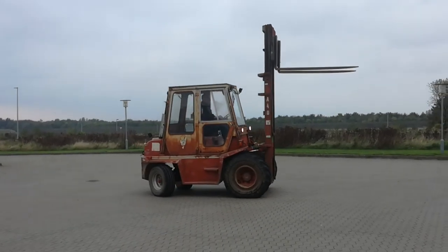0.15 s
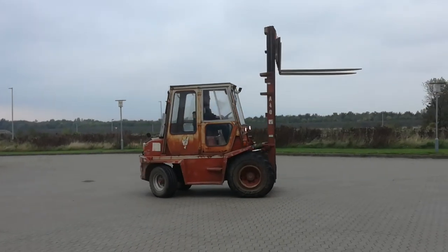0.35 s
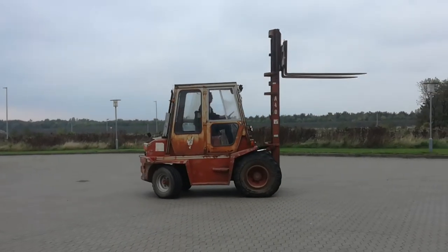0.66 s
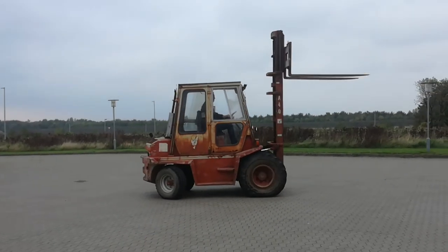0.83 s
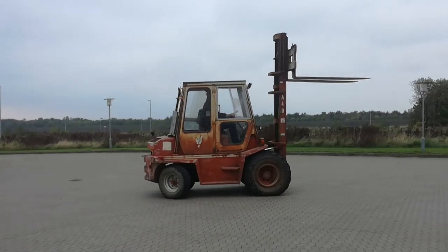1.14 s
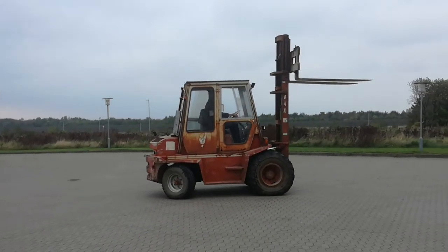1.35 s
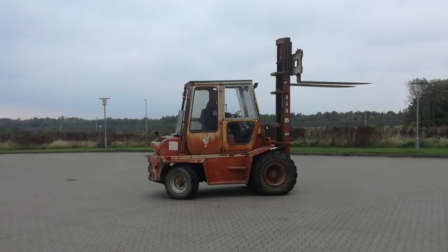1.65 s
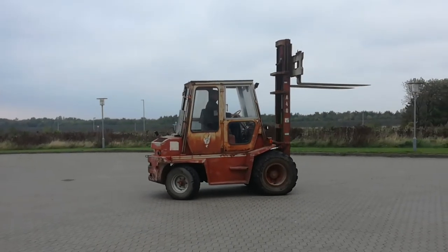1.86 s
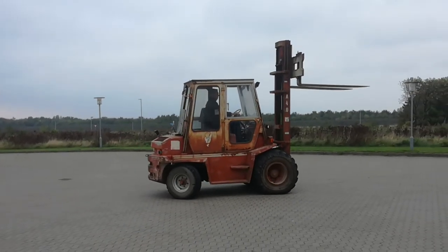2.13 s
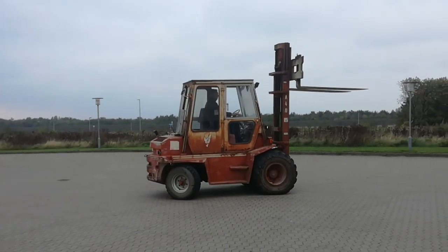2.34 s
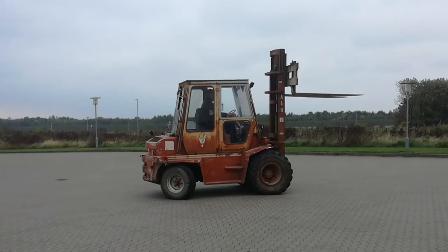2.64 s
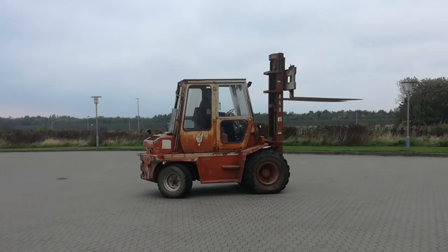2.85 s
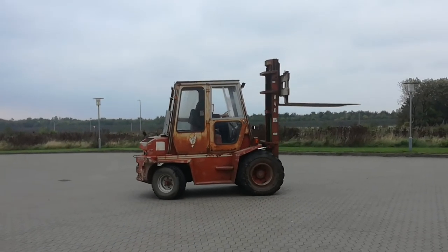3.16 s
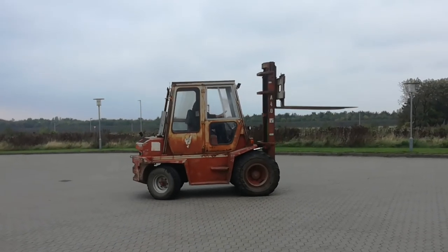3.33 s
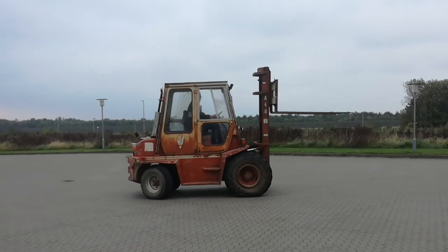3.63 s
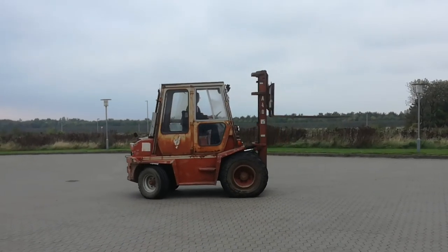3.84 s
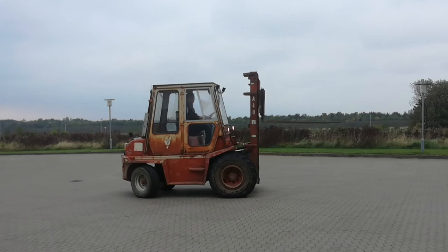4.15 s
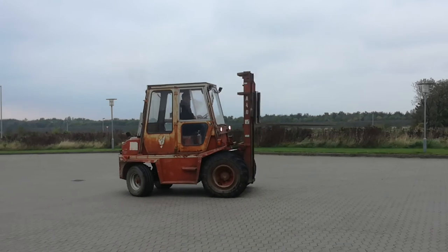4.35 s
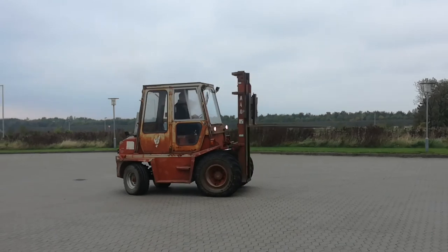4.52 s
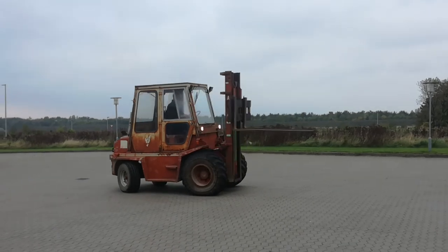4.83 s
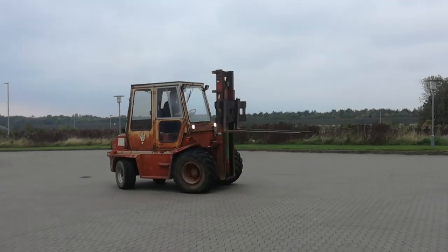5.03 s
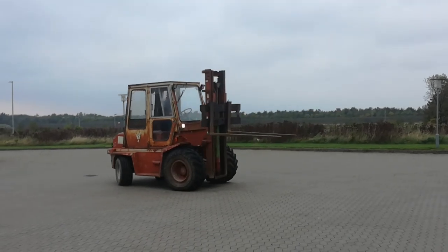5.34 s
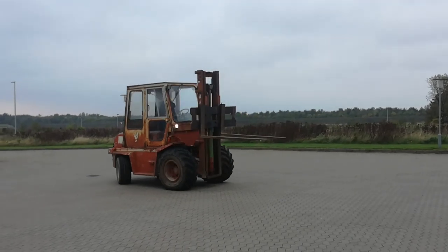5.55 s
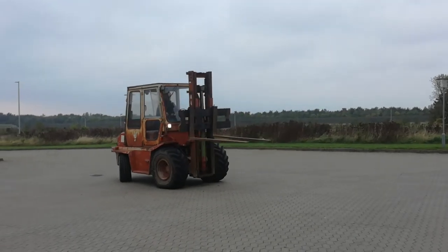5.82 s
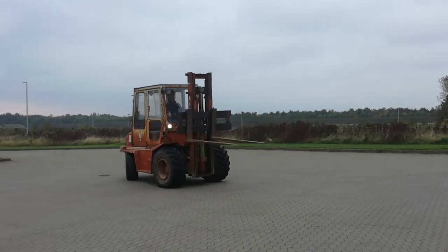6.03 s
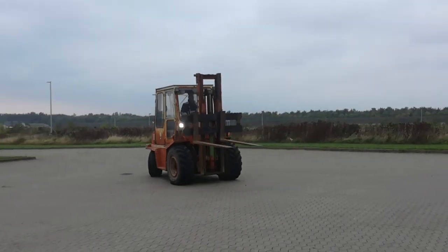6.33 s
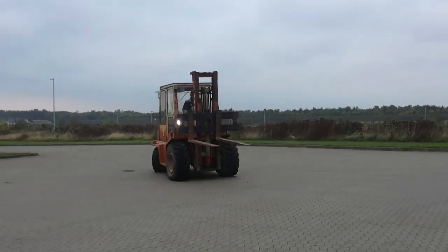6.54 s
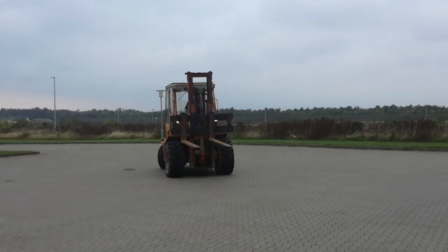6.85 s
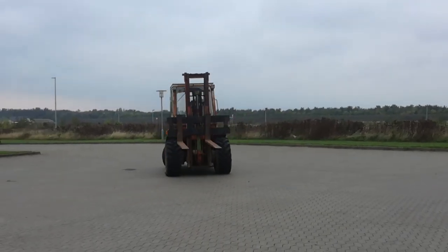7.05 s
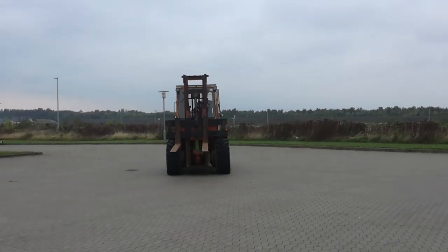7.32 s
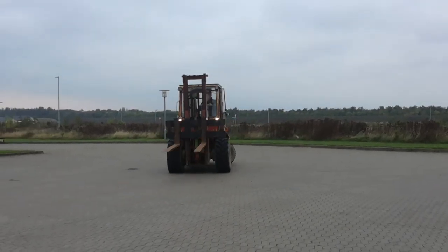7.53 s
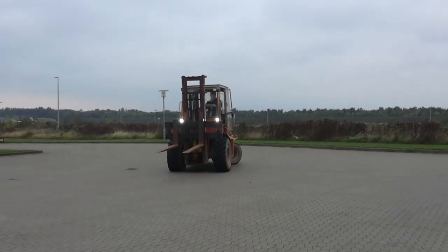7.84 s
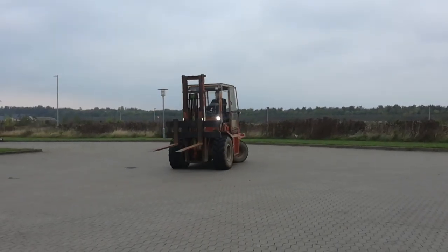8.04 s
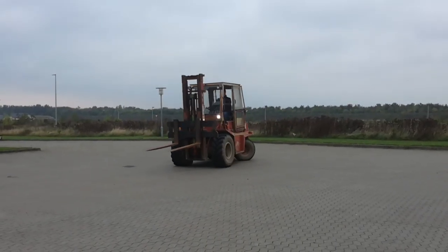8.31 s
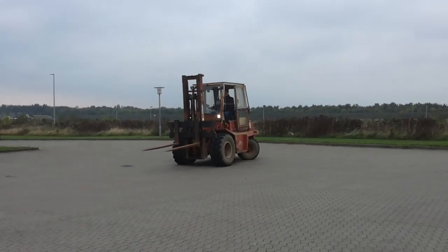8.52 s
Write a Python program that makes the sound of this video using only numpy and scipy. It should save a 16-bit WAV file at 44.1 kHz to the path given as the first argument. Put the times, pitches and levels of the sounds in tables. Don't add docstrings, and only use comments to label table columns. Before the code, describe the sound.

An old diesel forklift throbs and clatters outdoors while its mast scrapes down in jerks, then one long squealing slide ending in hard clunks.

```python
import sys
import numpy as np
from scipy import signal
from scipy.fft import rfft, irfft, next_fast_len
from scipy.io import wavfile
from scipy.ndimage import uniform_filter1d

SR = 44100
rng = np.random.default_rng(int(sys.argv[2]) if len(sys.argv) > 2 else 0)


def elevation(decibels):
    levels = np.asarray(decibels, float)
    return 10 ** (levels / 20)


def generate_wav(signal):
    frames = np.transpose(np.atleast_2d(signal))
    scaled = np.clip(frames, -1, 1) * 32767
    pcm = np.round(scaled).astype(np.int16)
    wavfile.write(sys.argv[1], SR, pcm)


N = 382769
T = np.arange(N) / SR
SIZE = next_fast_len(N + SR // 4)
HZ = np.fft.rfftfreq(SIZE, 1 / SR)

# time in seconds, block clatter in dB, heading in quarter turns from side on.
TURNING = [
    (1.35, -39.5, 0.05),
    (2.05, -38.5, 0.01),
    (4.3, -36.5, 0.35),
    (5.2, -39.5, 0.71),
    (6.4, -40.5, 0.88),
    (6.8, -40, 0.98),
    (7.5, -40, 1.11),
    (8.05, -41, 1.57),
    (8.6, -41.5, 1.4),
]
# time in seconds, pull in dB, boom of pipe and paving in dB.
LOAD = [(0.1, 3, 4), (0.4, -6, 1.5), (1.0, 4.5, -6), (2.05, -5, -1), (2.2, 0, 4.5), (2.65, 3.5, -1),
        (3.85, 1, -0.5), (4.15, 14.5, 0.5), (4.45, 2.5, -7), (4.6, 2.5, 1), (5.2, 4.5, -3),
        (5.35, -20, 5.5), (5.65, -1, 7), (5.8, -2.5, 1.9), (7.75, -0.2, 3), (8.05, 5.5, 2)]
# frequency in Hz, level in dB per Hz.
SLACK_CHAIN = [(120, -48), (200, -17), (386, -8.5), (455, -2), (527, -12.5), (610, 1), (1360, -1.5),
               (1610, -8), (2000, 1), (2310, -11.5), (4470, -5.5), (5560, -13.5), (8160, -26), (9100, -28),
               (15800, -33.5)]
# frequency in Hz, width in Hz, level in dB (all stand out alike here).
RAILS = [(536, 58, -5), (1340, 330, -1), (1816, 115, 0), (2960, 210, -12), (3424, 77, -11), (4150, 540, -8),
         (4870, 84, -11), (6240, 43, -17), (6710, 120, -20), (7870, 210, -21)]
# likeness of the ports,
# lead of the left in radians, left over right in dB.
MAST_PORTS = ([(60, -8), (130, 13), (290, 1), (640, 0.22), (1410, 0.78), (3100, 0.56), (6820, 0.5),
               (15000, 0)], [(0, 5.5), (1980, -0.4), (3530, 2), (4220, 2.5), (4650, 8), (5340, 8),
               (6030, 9), (7840, 5), (9990, 0), (11800, 31.5), (12300, 10), (14100, 8), (14900, 5),
               (15500, 18)], [(60, -2), (110, 7), (200, 0.5), (380, -0.5), (700, -1.5), (1290, -2),
               (2380, 2.5), (4400, -3.5), (8120, -8), (15000, 4.5)])
# Hz with likeness, radians, dB.
ENGINE_PORTS = ([(60, 0.88), (130, 1), (290, 0.63), (640, 0.55), (1410, 1), (3100, -0.6), (6820, 1),
                 (15000, 1)], [(0, 1), (690, -1.0), (1460, -8), (1720, -13), (2150, -9), (3100, -18),
                 (4050, -17.5), (4390, -18.5), (6200, -20.5), (9390, -22), (10500, -31.5), (12000, -43.5),
                 (13600, -40), (15500, -69)], [(60, -5), (110, -6), (200, 1), (380, -1.5), (700, 2.5),
                 (1290, -1), (2380, 9.5), (4400, -6), (8120, -9.5), (15000, 13)])


def evened(x):
    return x / np.sqrt(np.mean(x ** 2) + 1e-20)


def read(points):
    f, value = np.transpose(points)
    return np.interp(np.log(HZ + 1), np.log(f + 1), value)


def follow(rows):
    s, *columns = np.transpose(rows)
    return [np.interp(T, s, c) for c in columns]


def drift(hz):
    return evened(irfft(rfft(rng.standard_normal(SIZE)) / (1 + (HZ / hz) ** 4), SIZE)[:N])


def bump(x, centre, half):
    return np.exp(-((x - centre) / half) ** 2)


def dying(s, db, t60):
    return elevation(db - 60 * np.clip(T - s, 0, 1) / t60) * (T > s)


def shelf(hz):
    return 1 / (1 + (HZ / hz) ** 8)


def body(spectrum, peaks, lift_db):
    rings = sum(elevation(lift_db) / (1 + 2j * (HZ - hz) / width) for hz, width, _ in peaks)
    return elevation(read(spectrum)) * (1 + rings)


def unit(colour, lo_hz, hi_hz):
    inside = colour[(HZ > lo_hz) & (HZ < hi_hz)]
    return colour / np.sqrt(np.sum(abs(inside) ** 2) / len(HZ))


def ported(a, b, colour, ports):
    same, lead, balance_db = np.clip(read(ports[0]), 0, 1), read(ports[1]), read(ports[2])
    same = np.minimum(same, 0.35 + 0.65 * shelf(hz=5500))
    a, b = rfft([a, b], SIZE)
    left = a * np.exp(1j * lead) * elevation(balance_db / 2)
    right = (same * a + np.sqrt(1 - same ** 2) * b) * elevation(-balance_db / 2)
    return irfft(np.array([left, right]) * colour, SIZE)[:, :N]


def heard(gate, colour, ports):
    return ported(*gate * rng.standard_normal((2, N)), colour, ports)


def rumble(load_db):
    # frequency in Hz, level in dB per Hz.
    roll = [(12, -45), (20, -32), (71, -8.5), (96, -8.5), (122, -18.5), (147, -13.5), (400, -12),
            (520, -64), (880, -120)]
    slow_load_db = uniform_filter1d(load_db + 48.5, size=SR // 2)
    level = elevation(-51 + 0.44 * slow_load_db + 1.7 * drift(hz=1.0))
    return heard(level, unit(elevation(read(roll)) * shelf(hz=374), 20, 400), ENGINE_PORTS)


def pump_whines():
    # time in seconds, pitch in Hz, level in dB.
    whines = [
        [(.86, 1955, -46), (1.0, 1935, -49), (1.06, 1935, -58), (1.11, 1930, -45), (1.44, 1912, -42),
         (1.52, 1925, -45), (1.74, 1915, -45), (1.82, 1925, -57), (1.9, 1935, -50), (2.08, 1885, -50)],
        [(.29, 1500, -46), (.38, 1500, -44), (.5, 1500, -56), (.57, 1503, -43), (.72, 1505, -48),
         (.87, 1500, -52)],
        [(0, 1850, -44), (.1, 1845, -44), (.15, 1805, -45), (.27, 1800, -46)],
    ]
    out = np.zeros(N)
    for rows in whines:
        hz, db = follow(rows)
        on = np.clip(np.minimum(T - rows[0][0], rows[-1][0] - T) / 0.015, 0, 1)
        turn = 2 * np.pi * np.cumsum(hz + 2.0 * drift(hz=17.5)) / SR
        out += on * elevation(db + 5.0 + 1.0 * drift(hz=32.0)) * np.cos(turn)
    return out


def ticks():
    # start in seconds, peak in dB.
    faint_ticks = [(1.4462, -53), (1.5774, -62), (3.9292, -52), (4.0983, -52), (4.4081, -58), (4.5431, -50),
                   (4.6031, -53), (4.8073, -51), (5.7418, -51), (5.8027, -49.5), (6.0531, -51),
                   (6.6191, -50), (6.879, -55), (7.1596, -54)]
    # start in seconds, peak in dB, t60 in seconds.
    snaps = [(7.814, -28, 0.019), (7.819, -24, 0.02), (7.825, -26.5, 0.031), (7.831, -30, 0.029),
             (7.838, -34, .04)]
    faint = sum(dying(s, db - 9.0, 0.055) for s, db in faint_ticks)
    snap = sum(dying(s, db - 8.5, t60) for s, db, t60 in snaps)
    link = (shelf(hz=7800) - shelf(hz=3500)) * (0.11 + shelf(hz=5770)) + 0.023
    return (heard(faint, unit(1 - shelf(hz=7980), 9000, 15500), ENGINE_PORTS)
            + heard(snap, unit(link, 3500, 9000), MAST_PORTS))


def carriage_raps():
    # start in seconds, peak in dB, t60 in seconds.
    knocks = [(0.146, -30, .04), (2.1, -18, 0.044), (2.49, -28, .02), (3.779, -16, .05), (3.812, -11, 0.05),
              (3.843, -19, 0.076), (3.903, -22, 0.038), (8.581, -38, 0.032)]
    gate = sum(dying(s, db - 11, t60) for s, db, t60 in knocks)
    colour = body(SLACK_CHAIN, RAILS, lift_db=8.0) * (0.41 + shelf(hz=2700))
    return heard(gate, unit(colour, 400, 3000), MAST_PORTS)


def clunks():
    # start in seconds, peak in dB, pitch in Hz, t60 in seconds.
    blows = [(0.974, -22, 221, 0.086), (0.988, -23, 125, 0.089), (2.261, -23, 207, 0.11),
             (2.285, -20.5, 158, 0.084), (2.315, -33, 177, 0.29), (2.389, -27, 120, 0.13),
             (2.418, -23, 109, 0.16), (2.45, -28, 110, 0.13), (3.816, -17, 503, 0.087),
             (3.824, -18.5, 462, 0.053), (3.851, -30, 278, 0.2), (3.878, -23, 111, 0.096),
             (5.561, -37, 109, 0.13)]
    out, t = np.zeros(N + SR), np.arange(SR // 4) / SR
    for s, db, hz, t60 in blows:
        ring = np.zeros(len(t))
        for k, ratio in enumerate([1.024, 1.49, 0.98, 0.35, 3.1, 1.6]):
            fall_db = -3.5 * k - 60 * t * (1 + 2.2 * k) / t60
            ring += elevation(fall_db) * np.sin(2 * np.pi * hz * ratio * t)
        rise = np.minimum(t / 0.003, 1)
        out[round(s * SR):][:len(t)] += elevation(db - 0.5) * ring * rise
    boom = sum(dying(s, db - 11.5, 0.13) for s, db, *_ in blows)
    frame = shelf(hz=447) - shelf(hz=96) + 0.34 * shelf(hz=900) + 0.17 * shelf(hz=2500)
    return out[:N] + heard(boom, unit(frame, 90, 700), MAST_PORTS)


def scrape(chain, rails, spectrum):
    grit = evened(elevation(2.15 * drift(hz=294.0)))
    steel, low = body(spectrum, RAILS, lift_db=5.0), shelf(hz=2720)
    return (heard(chain * grit, unit(steel * (1 - low), 2000, 9000), MAST_PORTS)
            + heard(rails * grit, unit(steel * low, 300, 1825), MAST_PORTS))


def rattle(gate, spectrum, per_s):
    count = 36
    out, (f, level_db) = np.zeros((2, N)), np.transpose(spectrum)
    pitches = np.geomspace(900, 8200, count) * rng.uniform(0.94, 1.04, count)
    widths = rng.uniform(29.0, 84.0, count)
    for hz, width, side in zip(pitches, widths, rng.random(count)):
        hits = gate * (rng.random(N) < per_s / SR) * rng.standard_normal(N) * np.sqrt(SR / per_s)
        r = np.exp(-np.pi * width * np.sqrt(hz / 1000) / SR)
        pole = [1, -r * np.exp(2j * np.pi * hz / SR)]
        soft = signal.lfilter([1 - r], pole, hits)
        ring = signal.lfilter([np.sqrt(1 - r)], pole, soft).real
        out[int(side > 0.5)] += elevation(np.interp(np.log(hz), np.log(f), level_db)) * (hz / 1000) ** 0.16 * ring
    return ported(out[0] + out[1], out[0] - out[1], 1.0, MAST_PORTS)


def jerks():
    # start in seconds, peak in dB, length in seconds, weight of the low rails in dB.
    slips = [(0.0024, -24.5, 0.029, 0), (0.0435, -25, 0.044, -0.5), (0.079, -39, 0.033, 12),
             (0.141, -37.5, 0.025, 11), (0.189, -36, 0.04, 6.5), (0.243, -25.5, 0.042, -1),
             (0.277, -26, 0.043, -1), (0.313, -28, 0.048, 3), (0.367, -24, 0.017, -9),
             (0.4603, -26.5, 0.031, 1.5), (0.532, -23, 0.05, -1.5), (0.592, -30, 0.08, 2),
             (0.641, -23.5, 0.036, -3.5), (0.694, -26, 0.029, 1), (0.747, -24, 0.017, -3.5),
             (0.777, -28.5, 0.035, 0.5), (0.8684, -22, 0.014, -2.5), (0.895, -25, 0.04, -5.5),
             (0.941, -24.5, 0.025, -1), (1.015, -28, 0.054, -4), (1.0594, -30.5, 0.035, 3.5),
             (1.119, -31.5, 0.039, 4.5), (1.179, -36, 0.036, -3), (1.628, -26.5, 0.034, 2.5)]
    chain, rails = np.zeros((2, N))
    for s, db, length, low_db in slips:
        u = np.clip((T - s) / length, 0, 30)
        jerk = elevation(db - 7.5) * np.clip((T - s) / 0.001, 0, 1) / (1 + u ** 4)
        chain += jerk ** 2
        rails += (jerk * elevation(low_db)) ** 2
    chain, rails = np.sqrt(chain), np.sqrt(rails)
    return scrape(chain, rails, SLACK_CHAIN) + rattle(chain * elevation(-2.5), SLACK_CHAIN, per_s=60.0)


def roller_squeal(level):
    # frequency in Hz, width in Hz, level in dB, share of the glide.
    bands = [(4050, 110, -4, .25), (4370, 190, 0, 1), (4620, 180, -5, .6)]
    # time in seconds, pitch factor.
    glide = [(2.2, .995), (2.5, 1.015), (2.6, 1.0), (2.66, .975), (2.9, 1.005), (3.25, 1.035), (3.4, 1.01),
             (3.8, 1.015)]
    factor, = follow(glide)
    squeal = np.zeros((2, N))
    for hz, width, db, share in bands:
        turn = 2 * np.pi * np.cumsum(hz * factor ** share) / SR
        for port in squeal:
            port += elevation(db) * (drift(width / 2) * np.cos(turn) + drift(width / 2) * np.sin(turn))
    return ported(*squeal * level, 0.93, MAST_PORTS)


def slide():
    # time in seconds, push in dB, squeal of the rollers in dB.
    course = [(2.19, -31, -1), (2.4, -28.5, -1), (2.526, -29.5, 0.5), (2.63, -31, 0), (3.3, -33.5, 1),
              (3.47, -36.5, -2), (3.75, -35, 0), (3.818, -39, -14), (3.84, -46, -16)]
    # time in seconds, drop in dB, half length in seconds.
    catches = [(2.318, -5, 0.032), (3.421, -3, 0.037), (3.536, -11, 0.028), (3.626, -5, 0.0096),
               (3.71, -7, 0.034), (3.774, -21, 0.033)]
    # frequency in Hz, level in dB per Hz.
    mast = [(120, -52), (200, -13.5), (408, -2), (490, -4), (895, -1.5), (1130, -2), (1580, -7),
            (1860, -1.5), (2630, -9.5), (3790, -1), (4470, -5.5), (5770, -11), (6550, -16), (8940, -26.5),
            (15800, -32)]
    start_s, end_s = 2.17, 3.99
    db, squeal_db = follow(course)
    catch_db = sum(drop_db * np.clip(1 - abs(T - s) / half, 0, 1) for s, drop_db, half in catches)
    db, squeal_db = db + catch_db, squeal_db + 0.37 * catch_db
    low_db = -30.5 + 0.49 * (db + 34.5) - db
    on = np.minimum((T - start_s) / 0.012, 1 + (end_s - T) / 0.21)
    push = np.clip(on, 0, 1) * elevation(db)
    chain = push * elevation(-2.0 + 2.0 * drift(hz=25.6))
    rails_on = np.clip((T - start_s) / 0.06, 0, 1)
    rails = push * rails_on * elevation(low_db + 1.84 * drift(hz=26.0))
    out = scrape(chain, rails, mast) + rattle(push * elevation(-4.5), mast, per_s=110.0)
    hiss = unit(shelf(5350) - shelf(4600), 4600, 5350)
    out += heard(elevation(-35) * bump(T, 2.48, 0.1), hiss, MAST_PORTS)
    frame = unit(shelf(523) - shelf(173), 173, 523)
    out += heard(elevation(-42.5 + 3.2 * drift(hz=12.0)) * bump(T, 3.55, 0.47), frame, MAST_PORTS)
    return out + roller_squeal(push * elevation(2.0 * squeal_db - 3.5 + 3.4 * drift(hz=30.0)))


def injectors(turns):
    # time in seconds, level in dB.
    course = [(0.1, -58), (1.2, -59), (2.1, -53), (3.9, -52), (4.2, -53), (4.6, -53), (5.4, -60),
              (6.9, -59.5), (7.6, -58.5), (8.6, -64)]
    # frequency in Hz, width in Hz, level in dB.
    parts = [(2380, 680, 2.5), (3250, 800, -6), (5080, 360, -4.5), (5710, 260, -1), (7870, 800, -9),
             (11600, 1300, -17), (15000, 1500, -29)]
    size = elevation(4.5 * rng.standard_normal(400)[turns.astype(int) % 400])
    gate = evened(size * np.exp(-((turns - 0.1) % 1) / 0.24)) * elevation(follow(course)[0])
    rings = sum(elevation(db) / (1 + 2j * (HZ - hz) / width) ** 2 for hz, width, db in parts)
    return heard(gate, unit(rings, 2000, 15500), ENGINE_PORTS)


def piston_knock(turns):
    # frequency in Hz, level in dB, t60 in seconds.
    block_rings = [(690, -3, .045), (1120, -5, .03), (1345, 1, .035), (1790, -5, .03), (2150, -9, .02),
                   (3030, -12, .05)]
    cylinder_db = [-8, 0, 0, -1]
    heading = follow(TURNING)[1]
    front = np.sin(np.pi / 2 * heading)
    level_db = -43.5 - 21 * (1 - front) + 3 * bump(heading, 1.08, 0.09)
    size = elevation(np.take(cylinder_db, turns.astype(int) % 4))
    habit = rng.standard_normal((2, 5400))[:, (turns % 4 * 1350).astype(int)]
    grain = habit + 0.35 * rng.standard_normal((2, N))
    late = turns - 0.16 + 0.015 * drift(hz=20.0)
    strike = evened(np.diff(np.floor(late), prepend=0).clip(0, 1) * size)
    burst = evened(size * bump(turns % 1, 0.2, 0.038) * grain)
    blows = (0.6 * burst + 0.8 * strike) * elevation(level_db)
    rings = sum(elevation(db) / (1 + 2j * (HZ - hz) * t60 / 2.7) ** 2 for hz, db, t60 in block_rings)
    return ported(*blows, unit(rings, 400, 4000), ENGINE_PORTS)


def clatter(turns):
    cylinder_db = [0, 1, 3.6, 4]
    # frequency in Hz, level in dB per Hz.
    block_colour = [(88, -17), (150, -1), (316, -15), (414, -7), (518, -6), (680, 2), (840, -3),
                    (1310, -9.5), (1520, -12.5), (1810, -6.5), (2900, -19), (3770, -53), (6380, -120)]
    # frequency in Hz, level in dB per Hz.
    fan_colour = [(1350, -43), (2300, 2), (2570, -3), (2770, -10), (2950, -7), (3100, -5.5), (3650, -9),
                  (4340, -10), (4630, -11), (5850, -13.5), (6930, -25), (7880, -22.5), (9870, -31.5),
                  (13400, -33), (15800, -37)]
    # frequency in Hz, width in Hz, level in dB (all stand out alike here).
    covers = [(640, 76, 0), (1380, 570, 0), (1780, 39, 0), (3105, 110, -12), (4160, 70, -18),
              (5080, 110, -18), (7250, 410, -29)]
    level_db, heading = follow(TURNING)
    sump_db = -12.5 + 7 * np.minimum(heading / 0.66, 1)
    bright_db = -7 - 2.5 * np.clip((heading - 0.87) / 0.14, 0, 1)
    fan_db = -21 + 3.5 * bump(heading, 0.88, 0.19)
    firing = turns.astype(int)
    size = elevation(np.take(cylinder_db, firing % 4) + 1.0 * rng.standard_normal(400)[firing % 400])
    puff = size * uniform_filter1d(np.exp(-(turns % 1) / 0.5), size=150)
    block = body(block_colour, covers, lift_db=-22.5)
    fan = body(fan_colour, covers, lift_db=-3.5)
    sump, middle, bright = shelf(hz=990), shelf(hz=2416), shelf(hz=5410)
    gate = evened(2.4 + puff) * elevation(level_db + sump_db)
    out = heard(gate, unit(block * sump, 390, 730), ENGINE_PORTS)
    gate = evened(2.0 + puff) * elevation(level_db - 1.0 + 1.17 * drift(hz=27.0))
    out += heard(gate, unit(block * (middle - sump), 990, 1802), ENGINE_PORTS)
    gate = evened(1.0 + puff) * elevation(level_db + bright_db + 0.51 * drift(hz=18.0))
    out += heard(gate, unit(fan * (bright - middle), 1800, 6600), ENGINE_PORTS)
    gate = elevation(level_db + fan_db + 0.9 * drift(hz=12.0))
    return out + heard(gate, unit(fan * (1 - bright), 4900, 15500), ENGINE_PORTS)


def paving_null(x):
    depth = 0.48 * np.clip((follow(TURNING)[1] - 0.85) / 0.16, 0, 1)
    band = np.exp(-(2 * (HZ - 3630) / 1100) ** 2)
    return x - depth * irfft(rfft(x, SIZE) * band, SIZE)[:, :N]


def exhaust_levels(rate):
    # level in dB, share of pull, share of boom, gain when revved in dB.
    rule = [(-54, 0, 0, 12.5), (-41.5, 0.63, 0.16, -1), (-40, 0.12, 0.88, -1), (-47, 0.25, 0.052, -0.5)]
    idle, fast = 33.7, 35
    pull_db, boom_db = follow(LOAD)
    revved = np.clip((rate - idle) / (fast - idle), 0, 1)
    levels_db = [db + a * pull_db + b * boom_db + rev_db * revved for db, a, b, rev_db in rule]
    levels_db[3] = levels_db[3] - 21 * bump(T, 6.37, 0.32)
    return levels_db


def exhaust(turns, levels_db):
    # multiple of the firing rate, level in dB.
    uneven = [(1.5, -57.5), (2.75, -53), (3.75, -60), (5, -57.5), (5.5, -57.5), (6, -62.5), (7, -60),
              (8, -66), (9.5, -64.5), (11, -65.5)]
    lean, lag = 1.23, 1.32
    out = np.zeros(N)
    for k, db in enumerate(levels_db):
        phase = 2 * np.pi * (k + 1) * turns + lean - lag * k + 0.069 * drift(hz=2.5)
        out += elevation(db + 1.06 * drift(hz=21.8)) * np.cos(phase)
    for k, db in uneven:
        out += elevation(db + 4.7 * drift(hz=9.5)) * np.cos(2 * np.pi * (k * turns + rng.random()))
    return np.sqrt(2) * out * elevation([[0.3], [-0.3]])


def scene():
    # time in seconds, firings per second.
    speed = [(0.1, 30.35), (0.3, 32.13), (0.6, 31.88), (1.2, 31.01), (2.0, 30.84), (2.2, 28.32),
             (2.7, 30.59), (3.6, 31.01), (3.8, 31.72), (4.0, 35.64), (4.2, 37.27), (4.3, 35.12),
             (4.8, 35.42), (5.2, 33.53), (6.0, 32.54), (7.5, 32.76), (8.1, 33.25), (8.4, 33.55)]
    rate, = follow(speed)
    levels_db = exhaust_levels(rate)
    turns = np.cumsum(rate) / SR + 0.467
    load_db = levels_db[0] + 1.2 * follow(LOAD)[0]
    mast = ticks() + carriage_raps() + clunks() + jerks() + slide()
    block = injectors(turns + 0.33) + piston_knock(turns + 0.4) + clatter(turns + 0.4)
    return rumble(load_db) + pump_whines() + mast + paving_null(block) + exhaust(turns, levels_db)


def roll_off(x):
    return signal.sosfilt(signal.butter(12, 15850, fs=SR, output="sos"), x)


def record(dry):
    return roll_off(dry)


dry = scene()
out = record(dry)
generate_wav(out)
```